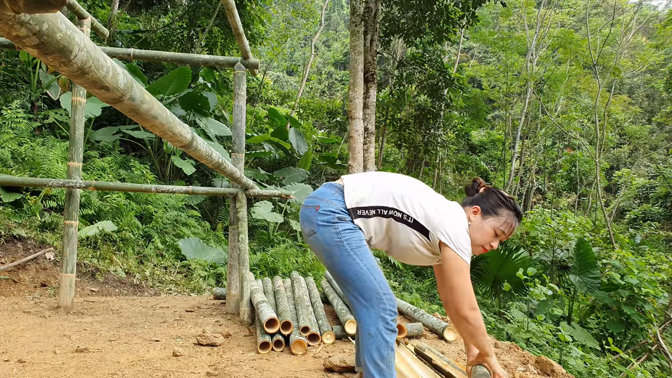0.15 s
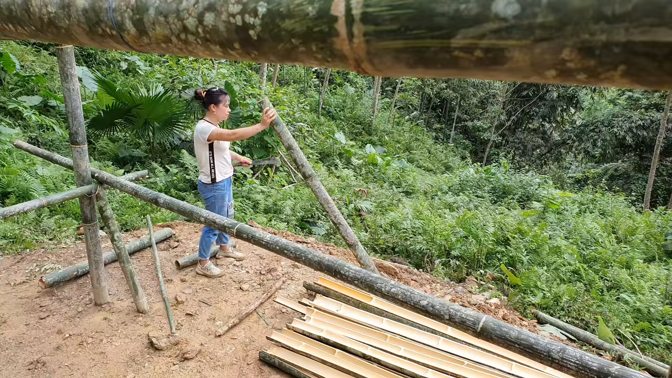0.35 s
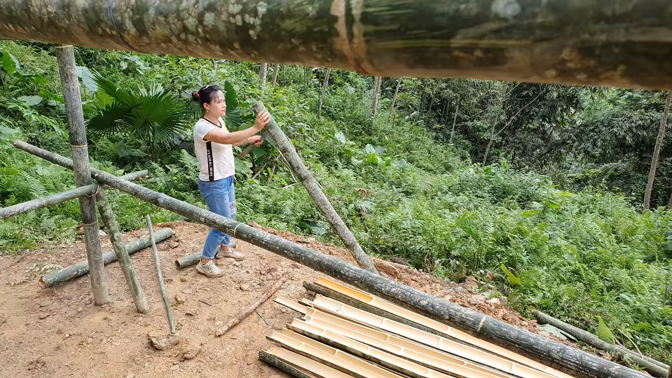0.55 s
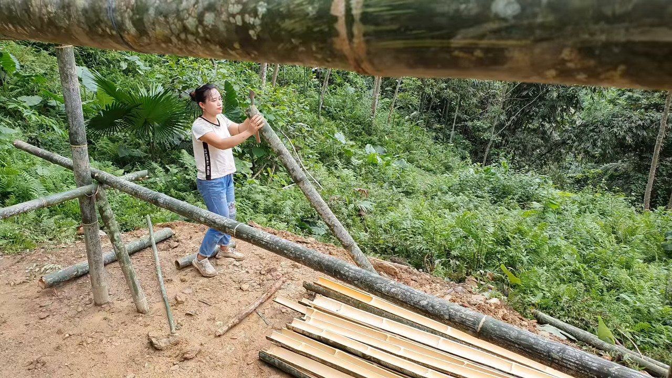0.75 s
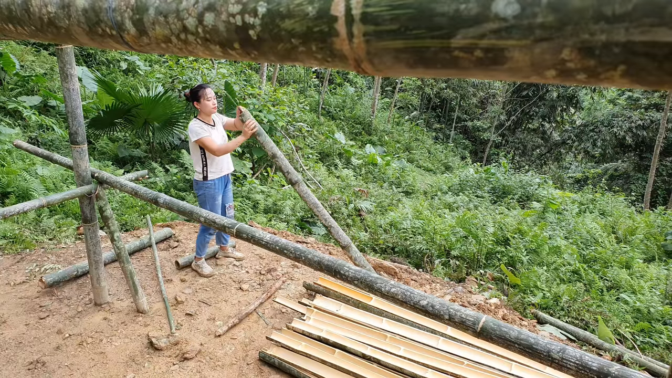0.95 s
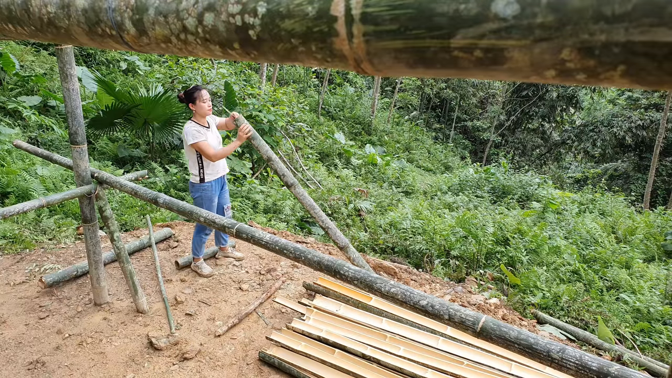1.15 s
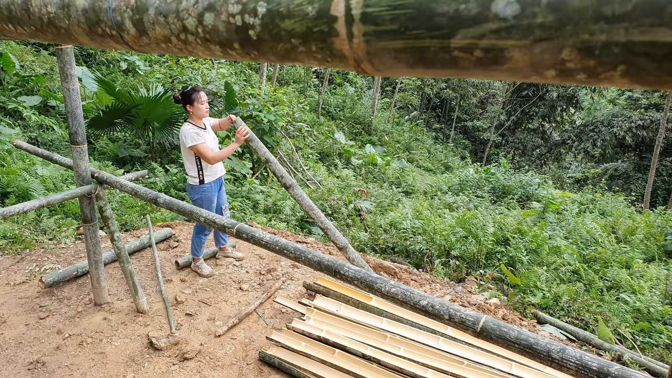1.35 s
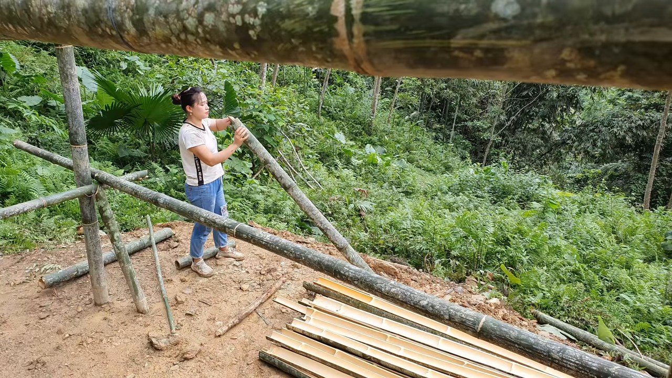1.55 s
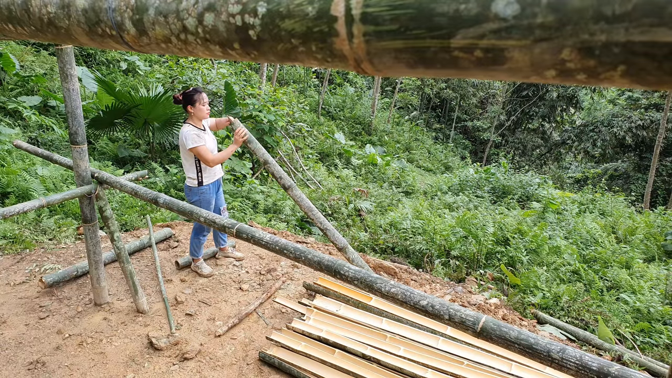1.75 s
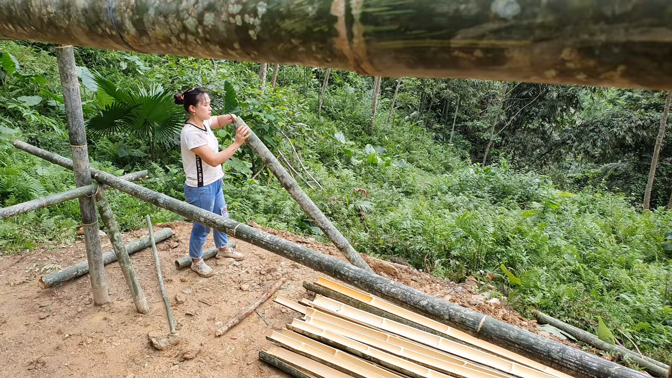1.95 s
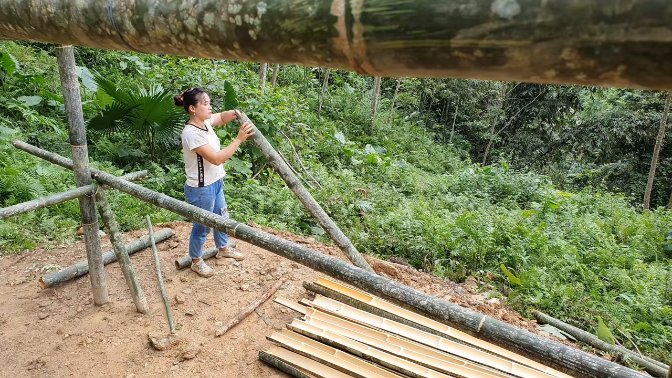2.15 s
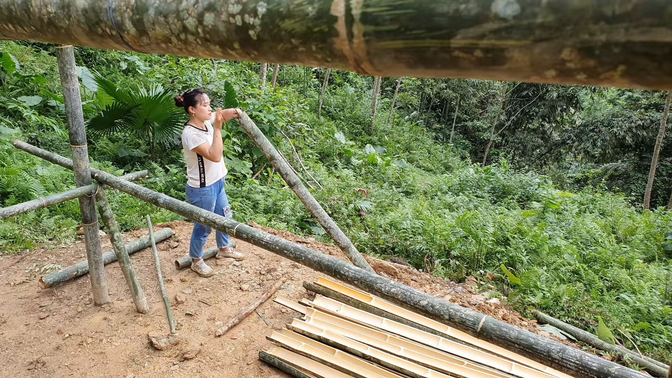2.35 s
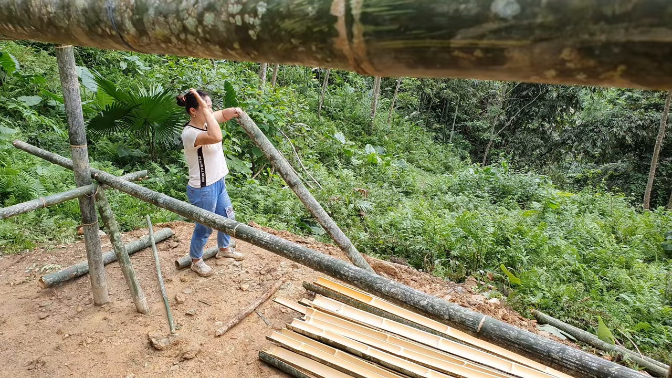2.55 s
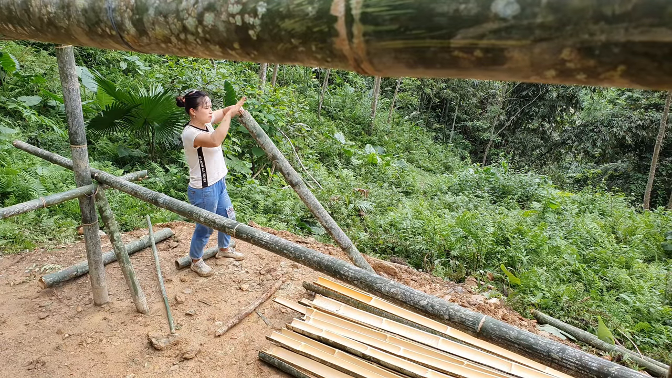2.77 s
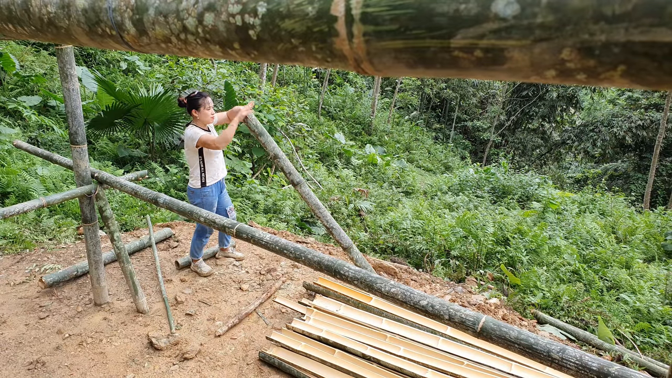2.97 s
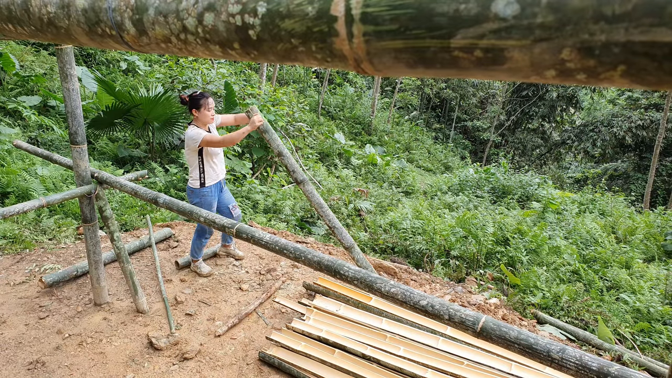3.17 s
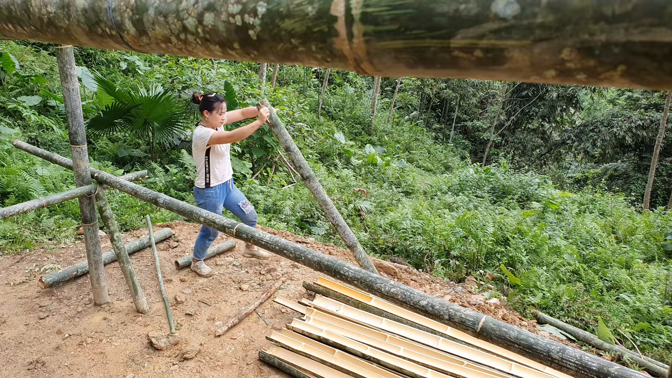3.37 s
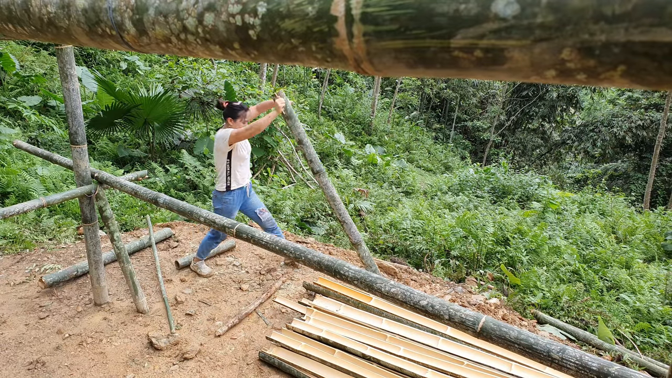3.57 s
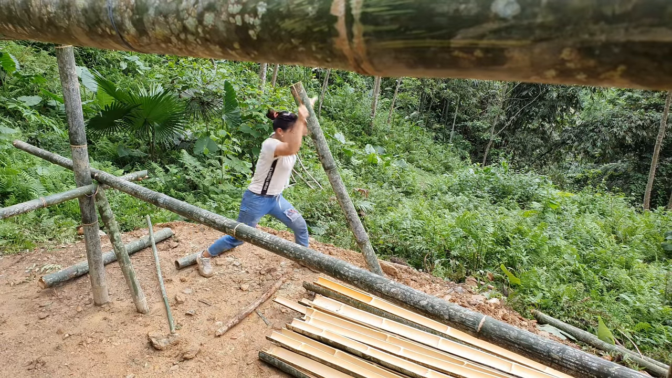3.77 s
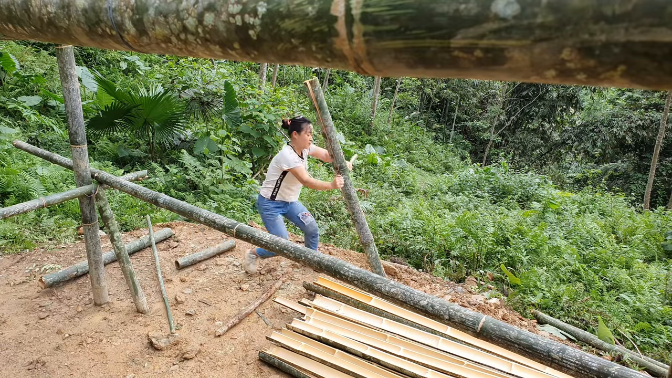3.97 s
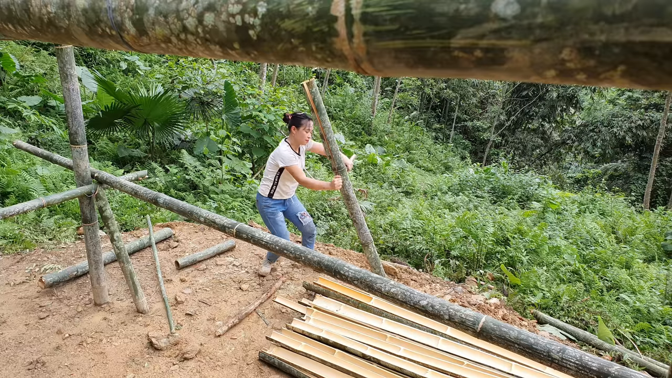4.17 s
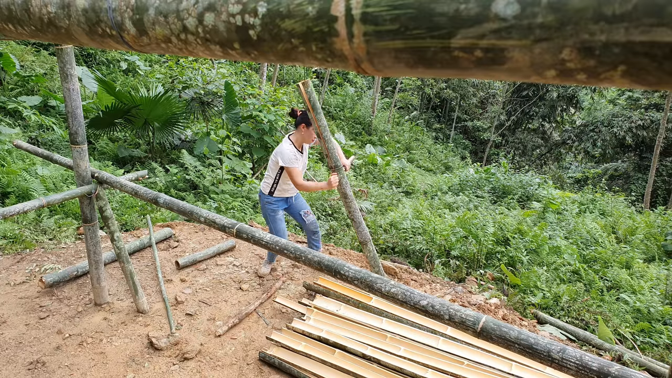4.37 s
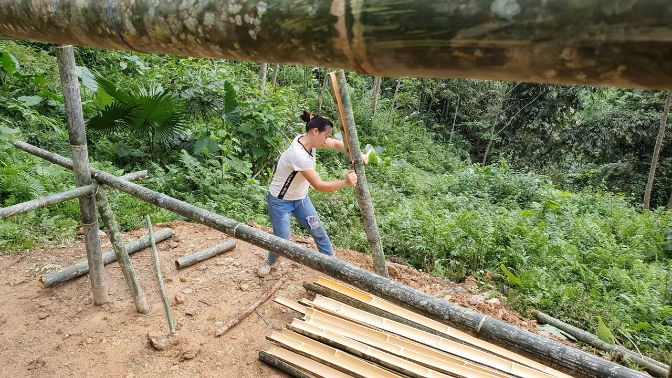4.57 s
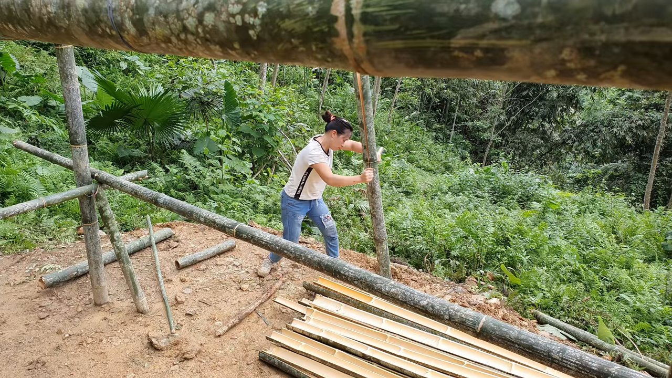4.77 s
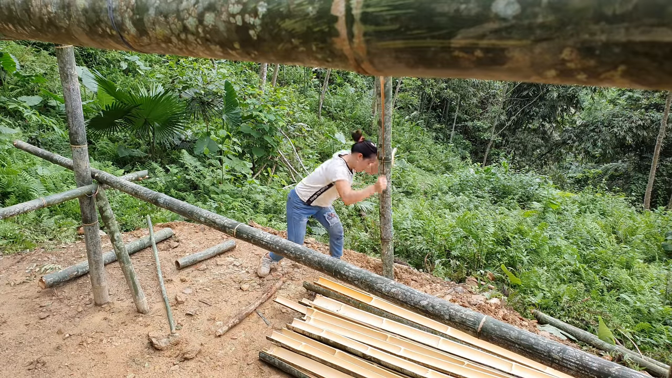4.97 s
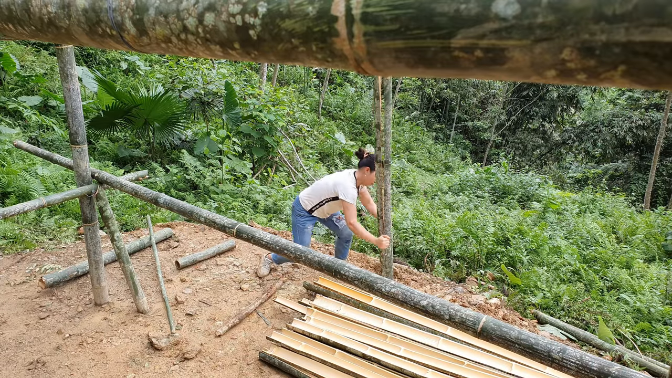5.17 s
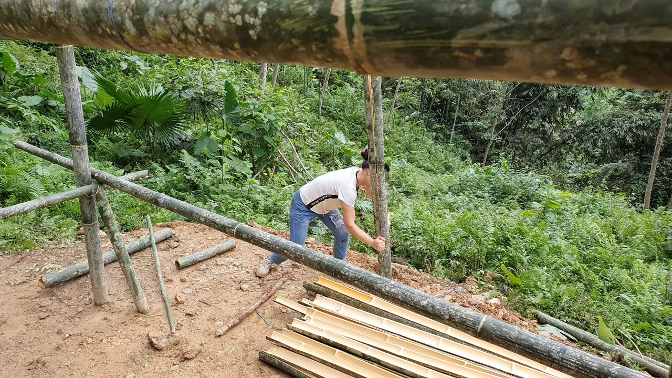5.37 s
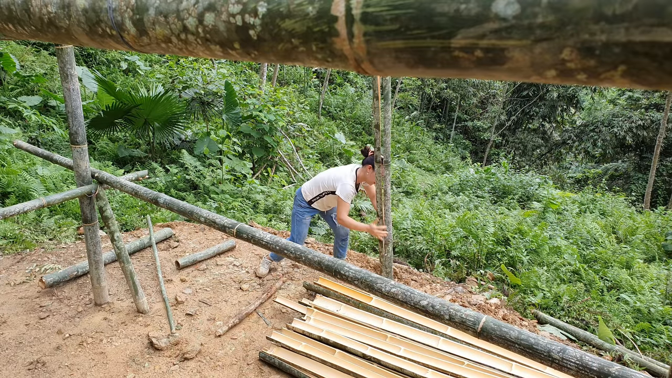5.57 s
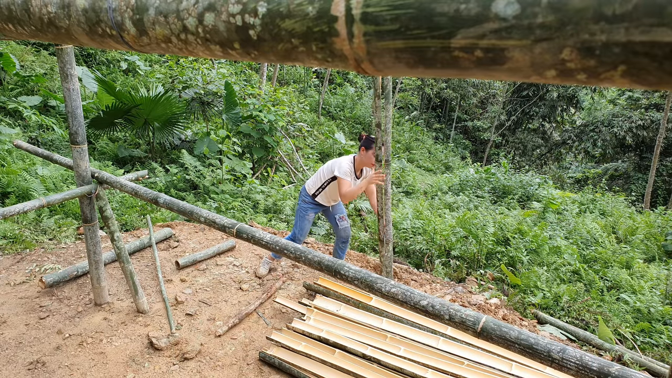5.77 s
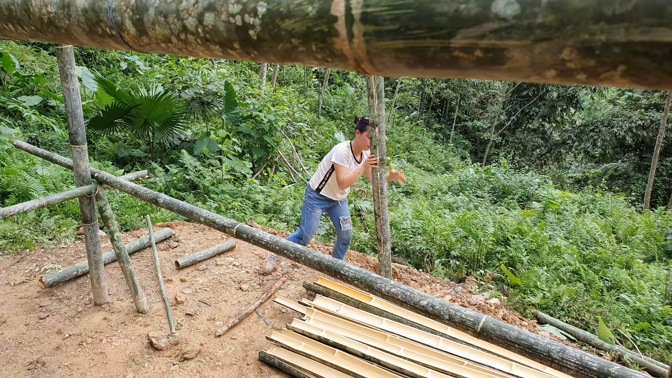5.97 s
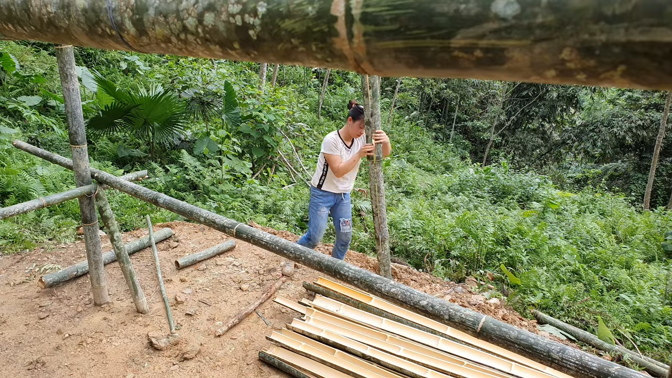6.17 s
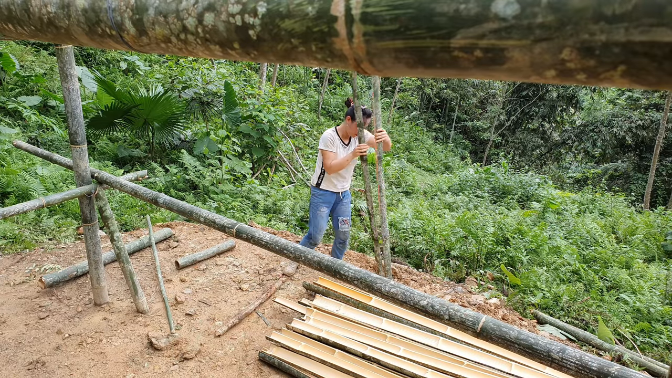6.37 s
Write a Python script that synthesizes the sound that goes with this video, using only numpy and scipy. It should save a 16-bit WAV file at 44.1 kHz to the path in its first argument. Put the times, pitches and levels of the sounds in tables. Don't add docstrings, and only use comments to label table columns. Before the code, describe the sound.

Dry bamboo strips clack and settle, insects take over, then a long hollow bamboo pole drags, thuds and knocks hollowly in gritty earth outdoors.

```python
import sys
import numpy as np
from scipy import signal
from scipy.fft import rfft, irfft
from scipy.io import wavfile
from scipy.ndimage import uniform_filter1d

SR = 44100
rng = np.random.default_rng(int(sys.argv[2]) if len(sys.argv) > 2 else 0)


def volts_from_db(level):
    exponent = np.asarray(level, float) / 20
    return 10 ** exponent


def master_out(mix):
    frames = np.transpose(np.atleast_2d(mix))
    ceiling = np.clip(frames, -1, 1)
    pcm = np.round(ceiling * 32767).astype(np.int16)
    wavfile.write(sys.argv[1], SR, pcm)


N = 283122


def level(x, db=0):
    return x * volts_from_db(db) / np.sqrt(np.mean(x ** 2))


def curve(table, col):
    return np.interp(np.arange(N) / SR, np.array(table)[:, 0], np.array(table)[:, col])


def add(out, s, x):
    i = int(s * SR)
    out[i:i + len(x)] += x[:N - i]


def noise():
    return rng.standard_normal(N)


def walk(rate):
    k = int(SR / rate)
    steps = np.repeat(rng.standard_normal(N // k + 1), k)
    return 1.3 * uniform_filter1d(uniform_filter1d(steps, k), k)[:N]


def grit(scatter_db):
    return level(noise() * volts_from_db(scatter_db * np.minimum(rng.exponential(size=N), 5)))


def high(x, hz):
    return signal.lfilter(*signal.butter(2, hz, "high", fs=SR), x)


def steep(x, hz):
    return signal.sosfilt(signal.ellip(10, .3, 80, hz, fs=SR, output="sos"), x)


def colour(x, points):
    hz, db = np.transpose(points)
    f = np.log(np.fft.rfftfreq(N, 1 / SR) + 1)
    outside = np.maximum(np.log(hz[0]) - f, 0) + np.maximum(f - np.log(hz[-1]), 0)
    return irfft(rfft(x) * volts_from_db(np.interp(f, np.log(hz), db) - 540 * outside), N)


def ring(x, hz, t60):
    r, w = np.exp(-np.log(1000) / (t60 * SR)), 2 * np.pi * hz / SR
    return signal.lfilter([np.sin(w)], [1, -2 * r * np.cos(w), r * r], x)


def favour(modes, note_hz, slope_db):
    return [-slope_db * min(abs(np.log2(hz / note_hz)), 1) for hz, *_ in modes]


def strike(modes, gains_db, stretch, push_s, luck, rise_s=0.0018):
    stretch = max(stretch, .1)
    blow = np.zeros(int(SR * (.05 + max(m[2] for m in modes) * stretch)))
    push = np.hanning(max(int(push_s * SR), 3))
    blow[:len(push)] = push / push.sum()
    rings = 0
    for (hz, db, t60), gain_db, (a, b) in zip(modes, gains_db, luck):
        mode = ring(blow, hz * (1 + 0.013 * b), t60 * stretch)
        rings = rings + volts_from_db(db + gain_db + 0.29 * a) * np.sign(b) * mode
    return rings * (1 - np.exp(-np.arange(len(blow)) / SR / rise_s))


def cracks(events, col, tail_s):
    env = np.zeros(N)
    for row in events:
        add(env, row[0], volts_from_db(row[1] + row[col]) * np.exp(-np.arange(SR // 10) / SR / tail_s))
    return env


def surges(rows, tail):
    t, size = np.arange(SR) / SR, np.full(N, 1e-7)
    for s, rise_s, hold_s, db, fall in rows:
        rise_s = max(rise_s, 1e-3)
        up = 28.5 * np.minimum(t / rise_s - 1, 0)
        after = np.maximum(t - rise_s - hold_s, 0)
        down = volts_from_db(-fall * after) + volts_from_db(tail[0] - tail[1] * after)
        add(size, max(s, 0), volts_from_db(db + up) * down * (1 - t ** 4))
    return uniform_filter1d(size, size=90)


def patchy(x, flow, patch_db, dull):
    edges = [high(x, hz) for hz in (1300., 1900., 2800., 4000., 6000., 9000.)]
    bands = [a - b for a, b in zip([x] + edges, edges + [0])]
    weak = np.minimum(flow / volts_from_db(-24), 1)
    return flow * sum(b * volts_from_db(patch_db * walk(55)) * weak ** (dull * max(k - 3, 0))
                      for k, b in enumerate(bands))


def echoes(x, smear_s):
    tail = rng.standard_normal(SR // 10) * np.exp(-np.arange(SR // 10) / SR / smear_s)
    return signal.fftconvolve(x, tail / np.sqrt(np.sum(tail ** 2)))[:N]


def spread(x, other, edge_hz, side_db):
    side = volts_from_db(side_db) * high(other, edge_hz)
    return np.array([x + side, x - side])


def heap_scene():
    return volts_from_db(-1000 * np.maximum(np.arange(N) / SR - 0.4605, 0))


# t/s, level/dB
EDGE_GAIN = [
    (.5, -9.5),
    (1.0, -9.5),
    (1.5, -3),
    (2.0, 1),
    (2.7, 2.5),
    (3.8, 2.5),
    (4.4, -2.5),
    (5.0, -2),
    (6.42, -0.5),
]


def heard_from(heap_db, edge_db):
    stay = uniform_filter1d(heap_scene(), size=2600)
    return stay * volts_from_db(heap_db) + (1 - stay) * volts_from_db(edge_db + curve(EDGE_GAIN, 1))


# t/s, hold/s, level/dB
SETTLES = [
    (0.0, 0.0041, -52.5),
    (0.105, 0.035, -44.5),
    (0.227, .01, -57),
    (.37, 0.011, -72),
]
# t/s, level/dB, f/Hz
BUMPS = [(.12, -44.5, 45), (2.33, -51, 69.5), (2.8, -43, 45), (3.06, -54, 49.6), (3.19, -45.5, 53.4),
         (3.318, -40.5, 48), (3.368, -38.5, 50), (3.5, -63, 49.7), (3.854, -31.5, 253), (3.87, -46.5, 50.7),
         (3.949, -17, 120.7), (5.155, -0.5, 226), (3.101, -23.5, 207), (5.162, -35, 90), (5.301, -36, 118),
         (5.941, -74, 82), (6.311, -45.5, 147)]


def ground():
    out = np.zeros(N)
    for s, db, hz in BUMPS:
        bump = strike([(hz, 0, 7.5 / hz)], [0], 1, 0.66 / hz, [(0, 1e-3)], rise_s=.5 / hz)
        add(out, s, volts_from_db(db) * high(bump, .5 * hz))
    weight = surges([(s, 0.01, hold, db, 250.5) for s, hold, db in SETTLES], tail=(-18, 60))
    rumble = colour(noise(), [(60, -10.0), (110, -7.5), (190, 1.0), (330, -8.5), (450, -29.5)])
    out += weight * level(rumble)
    return spread(out, echoes(out, .02), 90, -16.5)


# t/s, peak level/dB, crack level/dB, ring t60/s, loudest note f/Hz
CLACKS = [(0.007, -39, -4, 0.04, 1664), (0.062, -46, 4.5, 0.06, 1614), (0.093, -20, 0.5, 0.029, 794),
          (0.1, -0.5, -14.5, 0.014, 848), (0.123, -15.5, -25, 0.073, 840), (0.152, -20, -4, 0.12, 1310),
          (0.165, -38.5, -12, 0.051, 1340), (0.382, -35, -7, 0.078, 740), (0.406, -19.5, -17, 0.15, 2830),
          (0.411, -30, -19, 0.1, 1140), (0.44, -22.5, -10, 0.06, 2360), (0.45, -44, -20, 0.055, 905),
          (.205, -31, -15, 0.073, 848), (.255, -44.5, 5, 0.032, 1140)]
# t/s, hold/s, chatter level/dB, dust level/dB, fall/(dB per s)
CHATTERS = [
    (0.004, 0.0031, -75, -43, 570),
    (0.042, 0.043, -68, -60, 509),
    (.092, 0.013, -24, -30.5, 290.5),
    (0.379, .012, -56, -65, 700),
    (.402, 0.0063, -56, -47, 1100),
    (0.44, 0.0048, -50, -56, 903),
]
# f/Hz, level/dB, t60/s
SLAT_MODES = [(542.6, -13.5, 0.069), (740, -7, 0.042), (848, -4, .06), (1140, 1, 0.019), (1307, -8.5, 0.06),
              (1430, -15, 0.048), (1670, -14, 0.024), (1906, -22, 0.014), (2360, -11.5, 0.034),
              (2830, -11.5, 0.022)]
# f/Hz, level/dB (per Hz)
SPLINTER = [(180, -49), (300, -18), (842, -7.5), (930, -13.5), (1300, -10.5), (1610, -9.5), (7690, -27.5),
            (16000, -44)]


def slats():
    rise_s = 0.002
    chatter = level(sum(volts_from_db(db) * ring(grit(0.93), hz, t60) for hz, db, t60 in SLAT_MODES))
    force = surges([(s, rise_s, hold, db, fall) for s, hold, db, _, fall in CHATTERS], tail=(-26.5, 160))
    out = volts_from_db(2.0) * heap_scene() * force * chatter
    luck = rng.standard_normal((len(CLACKS), len(SLAT_MODES), 2))
    for (s, db, _, t60, note_hz), own in zip(CLACKS, luck):
        gains = favour(SLAT_MODES, note_hz, 24)
        add(out, s, volts_from_db(db - 1.5) * strike(SLAT_MODES, gains, t60 / 0.071, .0003, own, rise_s=.0005))
    out = high(high(out, 450), 450)
    flow = surges([(s, rise_s, hold, db, fall) for s, hold, _, db, fall in CHATTERS], tail=(-13.5, 100))
    flow = heap_scene() * flow + volts_from_db(-10.0) * cracks(CLACKS, 2, .004)
    dust = [patchy(level(colour(grit(2.8), SPLINTER), 0.63), flow, 2.1, 0.13) for _ in range(2)]
    return spread(out, echoes(out, .012), 600, -7.0) + spread(*dust, 900, -1.5)


def cricket():
    t = np.arange(N) / SR
    phase = (25 * t + .45 - .002 * t ** 3 + .012 * walk(20)) % 1
    stroke = uniform_filter1d(np.exp(-(1 - (phase - .03) % 1) / .2), size=110) * volts_from_db(1.2 * walk(25))
    whistle = stroke * np.sin(2 * np.pi * np.cumsum(7440 + 22 * walk(130)) / SR)
    near = np.array([volts_from_db(0.5) * whistle, volts_from_db(11) * np.roll(whistle, 7)])
    far = np.array([level(ring(noise(), 7450, .03), -16) for _ in range(2)])
    fade = volts_from_db(-1 * (t - 2))
    return fade * steep(near + far * [[volts_from_db(-3)], [volts_from_db(2.5)]], 9500)


# f/Hz, level/dB (per Hz)
CHORUS = [(3650, -26), (4100, -9), (4700, -11.5), (5400, -5), (6000, -7), (6600, -20), (7200, -1),
          (8400, -9.5), (8900, -15.5), (9800, -4.5), (10250, -11)]
# f/Hz, level/dB (per Hz)
TREETOP = [(13200, -9.5), (14400, -7), (15300, -7), (15500, -9.5)]


def chorus():
    choir = [level(colour(noise(), CHORUS)) * volts_from_db(0.53 * walk(11.0)) for _ in range(2)]
    top = [level(colour(noise(), TREETOP), -24.0) * volts_from_db(3.0 * walk(12)) for _ in range(2)]
    return np.array(choir) + np.array(top)


# f/Hz, level/dB (per Hz)
FOREST = [(18, -36), (30, -12.5), (65, -4), (300, -6), (365, -3.5), (410, -10.5), (755, -2), (994, -12),
          (1500, -10.5), (3300, -19), (4290, -48.5), (7260, -120)]


def stream():
    hush = spread(colour(noise(), FOREST), colour(noise(), FOREST), 220, 1.0)
    return volts_from_db(0.64 * walk(5.3)) * level(hush)


# centre of first rasp t/s, rasps, spacing/s, level/dB, lead of the high singer/s
PHRASES = [
    (.51, 4, .136, 0, 0),
    (1.05, 3, .12, -2, .015),
    (1.42, 4, .133, -2.5, .048),
    (1.93, 6, .133, 0, 0),
    (2.87, 1, .13, -2, 0),
    (3.43, 4, .137, -1, 0),
    (4.29, 2, .145, -5, 0),
    (4.69, 3, .137, 0, 0),
    (5.69, 6, .132, 0, 0),
]


def bush_crickets():
    t, out = np.arange(N) / SR, 0
    phase = (100 * t + .8 * walk(5)) % 1
    shape = np.sin(np.pi * phase) ** 2
    rasp = np.exp(-((t[:SR // 8] - .06) / 0.029) ** 4)
    for hz, share in ((5500, 0.25), (5750, 0.9)):
        gate = np.zeros(N)
        for s, count, spacing, db, lead in PHRASES:
            for k in range(count):
                add(gate, s + k * spacing - share * lead - .06, volts_from_db(db) * rasp)
        pitch = hz + 500 * (.45 - phase) + 260 * walk(1400)
        scratch = shape * volts_from_db(2.5 * walk(300)) * np.sin(2 * np.pi * np.cumsum(pitch) / SR)
        scratch = steep(scratch, 7500)
        octave = shape * colour(noise(), [(11100, -13.0), (11300, -9), (11600, -22.0)])
        out = out + gate * (level(scratch) + gate * level(octave, -15.5))
    return np.array([volts_from_db(-4) * out, volts_from_db(-7) * np.roll(out, 9)])


# t/s, lowest note level/dB, overtone level/dB
TAPS = [
    (1.505, -55.5, -23.5),
    (2.735, -38, -5),
    (2.75, -37, 1),
    (3.041, -37, -0.5),
]
# f/Hz, level/dB, t60/s
TUBE_MODES = [(149.6, -1.5, 0.6), (370, -28, 0.22), (652, 13, 0.14), (939, -2, 0.24), (1270, -25, 0.15),
              (1462, 18, 0.069), (2046, -26.5, .1)]


def tube():
    out = np.zeros(N)
    even = np.full((len(TUBE_MODES), 2), 1e-3)
    for s, db, over_db in TAPS:
        gains = [0] + [over_db] * (len(TUBE_MODES) - 1)
        add(out, s, volts_from_db(db) * strike(TUBE_MODES, gains, 1, .0008, even))
    return spread(out, echoes(out, .02), 90, -16.5)


# t/s, rise/s, hold/s, pole body level/dB, soil hiss level/dB
DRAGS = [(2.725, 0.012, 0.018, -36, -36), (3.03, 0.0035, 0.059, -31.5, -38),
         (3.057, 0.0096, 0.044, -37.5, -47.5), (3.658, 0.053, 0.035, -72, -68),
         (3.81, 0.024, 0.01, -53.5, -59), (3.843, 0.0069, 0.086, -23, -31),
         (3.943, .012, .008, -14.5, -43.5), (3.984, 0.0039, 0.048, -35.5, -54.5),
         (4.528, 0.0079, 0.057, -41.5, -47.5), (5.047, 0.039, 0.027, -36, -51),
         (5.063, 0.055, 0.0076, -30.5, -39), (5.144, 0.013, 0.017, -20.5, -37.5),
         (5.166, 0.048, 0.031, -47.5, -40.5), (5.56, 0.01, 0.022, -40, -50),
         (5.634, 0.0083, .01, -48.5, -74.5), (5.93, 0.038, 0.33, -68.5, -85),
         (6.3, 0.0081, 0.036, -50.5, -77)]
# t/s, peak level/dB, low note level/dB, crack level/dB, ring t60 scale
KNOCKS = [(2.732, -26.5, -31, 5.5, 0.86), (3.039, -13, -26, 1, 0.24), (3.065, -19.5, -15, -30, 1),
          (3.478, -45.5, -21, -25.5, 1), (3.85, -14.5, -13, -16, 0.8), (3.943, -0.5, -12, -8.5, 0.84),
          (3.966, -21, -0.5, -32, 0.64), (4.015, -20.5, 7.5, -35.5, 0.8), (4.532, -26, -2.5, 3.5, 0.85),
          (4.581, -43, -28, -3, 0.83), (4.727, -50, 5, 0, 0.96), (5.074, -38, 2.5, -9.5, 0.99),
          (5.155, -0.5, -5.5, -4, 0.58), (5.171, -10.5, 12.5, -40, 0.25), (5.224, -17.5, 2.5, -38, 0.33),
          (5.572, -32, -48, 2, 1), (5.608, -30, -12, -8, 0.75), (5.642, -34.5, 4.5, -39, 1),
          (5.949, -48, 1, -28, 0.86), (6.015, -55, 5.5, -21.5, 1), (6.064, -53, -14, -13, 0.84),
          (6.301, -38.5, 9, -48, 0.9)]
# f/Hz, level/dB, t60/s
POLE_MODES = [(262, -6, 0.023), (329, 5, 0.038), (400, -14.5, 0.23), (528.3, -5, 0.12), (600, 1.5, 0.064),
              (684.8, 6, 0.055), (757, -2, 0.084), (940, -24.5, 0.055), (1140, -12.5, 0.043),
              (1453, -17, 0.13), (1950, -28, 0.019), (2500, -14, 0.028)]
# t/s, f/Hz, share level/dB
AIR_NOTE = [(2.75, 228, -18), (3.04, 256, -12.5), (3.12, 247, -14), (3.85, 257.8, -2), (3.93, 313.4, -6.5),
            (3.97, 305.4, -8), (4.1, 296, -19), (4.56, 320, -3.5), (5.07, 319.9, 3.5), (5.14, 353.5, -11),
            (5.185, 262, 2), (5.26, 283, -2), (5.57, 350, -5), (5.7, 331, -5), (6.3, 318, -3.5)]
# f/Hz, level/dB (per Hz)
SOIL = [(530, -18.5), (900, -1.5), (1030, -5), (1640, -8), (3380, -8), (5280, -13), (11000, -17),
        (14900, -21), (16000, -38.5)]


def pole():
    low_edge_hz = 420
    grains = grit(0.73) * volts_from_db(2.2 * walk(90))
    body = level(sum(volts_from_db(db) * ring(grains, hz, t60) for hz, db, t60 in POLE_MODES if hz >= low_edge_hz))
    turn = 2 * np.pi * np.cumsum(curve(AIR_NOTE, 1)) / SR
    air = level((.4 + walk(130)) * np.sin(turn) + walk(130) * np.cos(turn))
    force = surges([(s, rise, hold, db, 377) for s, rise, hold, db, _ in DRAGS], tail=(-20.5, 58.4))
    out = volts_from_db(-3) * force * (body + air * volts_from_db(curve(AIR_NOTE, 2)))

    luck = rng.standard_normal((len(KNOCKS), len(POLE_MODES), 2))
    for (s, db, low_db, _, stretch), own in zip(KNOCKS, luck):
        gains = np.where(np.array(POLE_MODES)[:, 0] < low_edge_hz, low_db, favour(POLE_MODES, 675, 2.5))
        add(out, s, volts_from_db(db - 7) * strike(POLE_MODES, gains, stretch, 0.00048, own))
    out = high(out, 130)

    spills = [(s, rise, hold, db, 15.5 / (rise + hold)) for s, rise, hold, _, db in DRAGS]
    flow = surges(spills, tail=(-15.5, 58.7)) * volts_from_db(0.81 * walk(80))
    flow = flow + volts_from_db(-18.5) * cracks(KNOCKS, 3, 0.0065) + volts_from_db(-20.5) * cracks(KNOCKS, 3, 0.0083)
    near, far = [patchy(level(colour(grit(2.4), SOIL), 0.5), flow, 2.2, .09) for _ in range(2)]
    far = .75 * far + .6 * np.roll(near, -9)
    return spread(out, echoes(out, 0.01), 500, -6.0) + spread(near, far, 900, -0.5)


def scene():
    bamboo = ground() + slats() + tube() + pole()
    insects = heard_from(-58, -58.5) * (chorus() + bush_crickets())
    soloist = heard_from(-61.5, -54.5) * cricket()
    return bamboo + insects + soloist + heard_from(-62, -68) * stream()


def top_cut(x):
    return signal.sosfilt(signal.butter(12, 16810, fs=SR, output="sos"), x)


def record(dry):
    rounded = np.tanh(0.81 * high(dry, 45)) / 0.78
    mix = steep(rounded, 15750)
    return top_cut(mix)


dry = scene()
out = record(dry)
master_out(out)
```